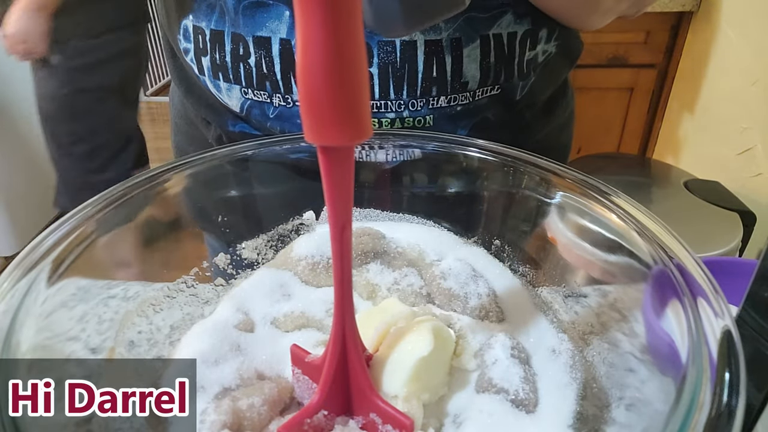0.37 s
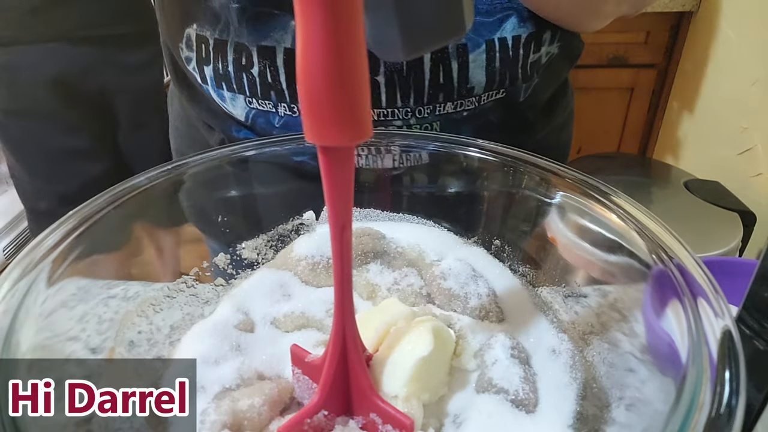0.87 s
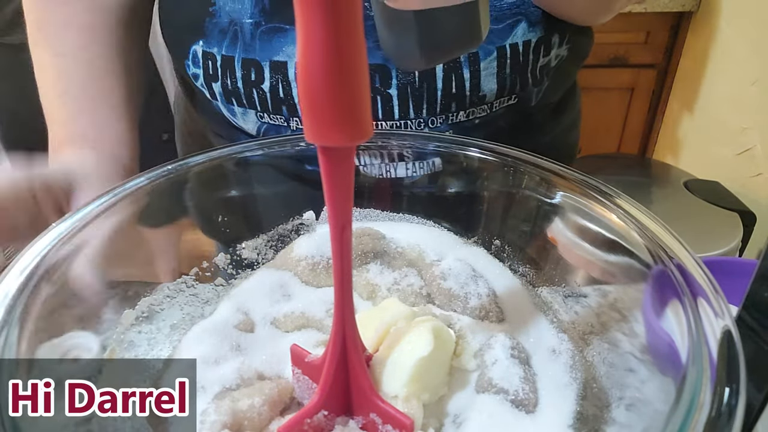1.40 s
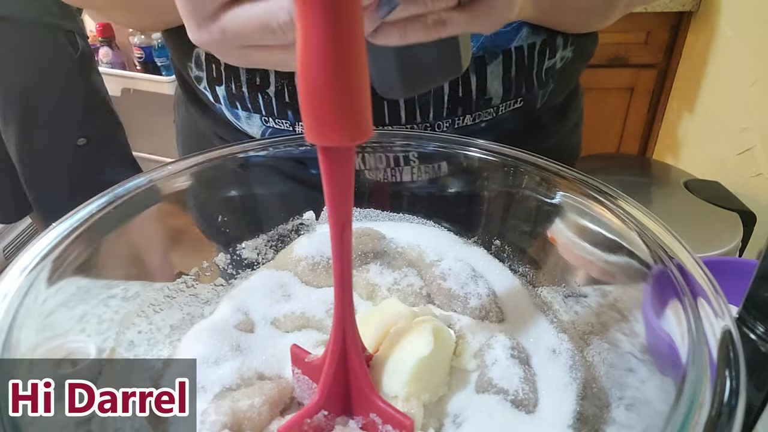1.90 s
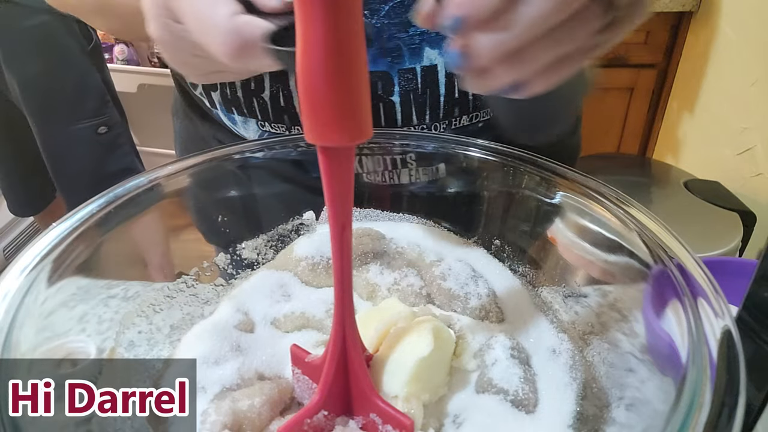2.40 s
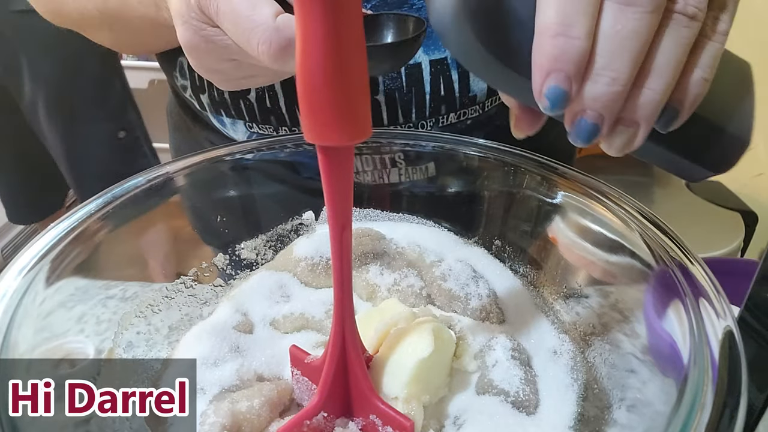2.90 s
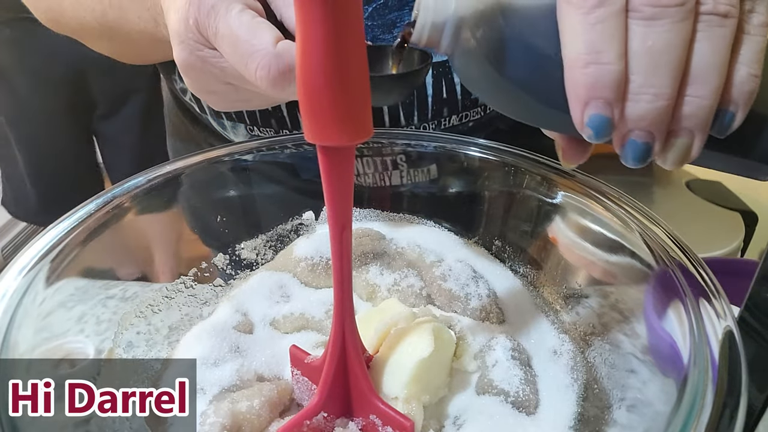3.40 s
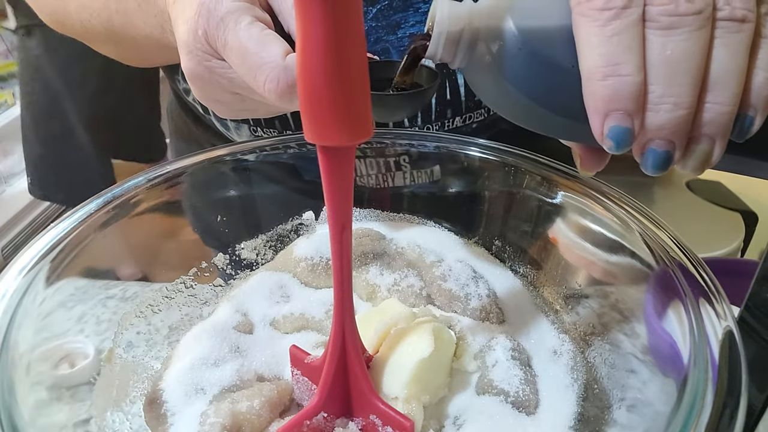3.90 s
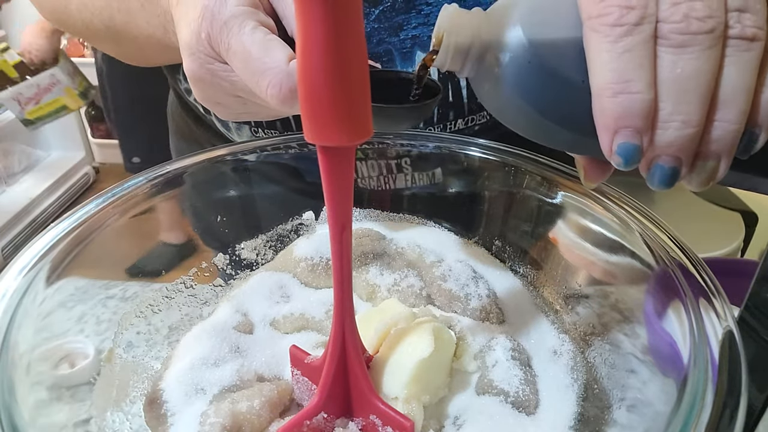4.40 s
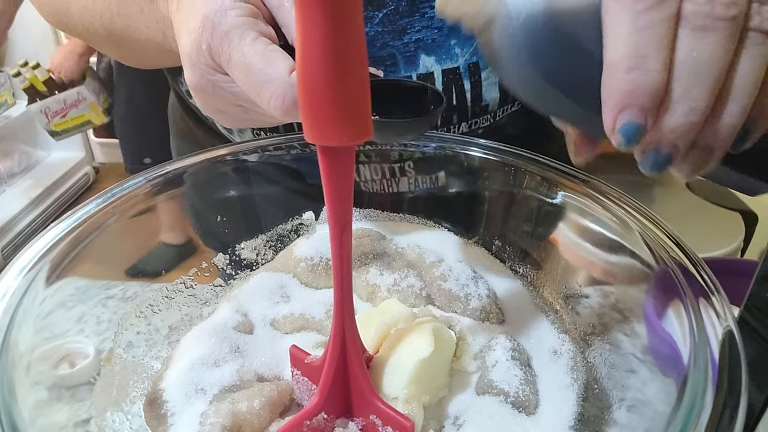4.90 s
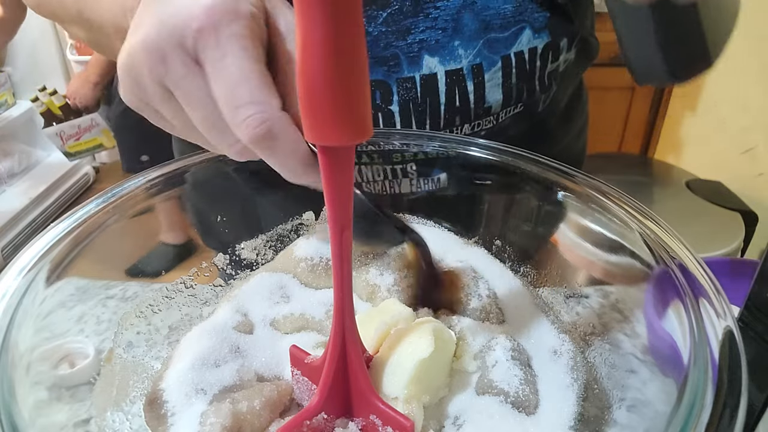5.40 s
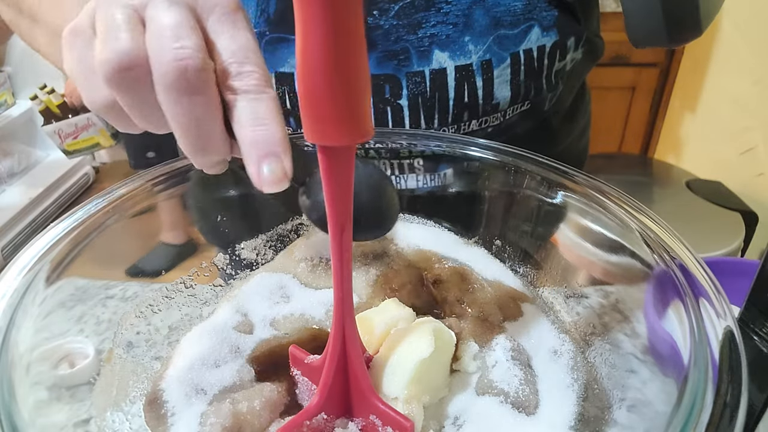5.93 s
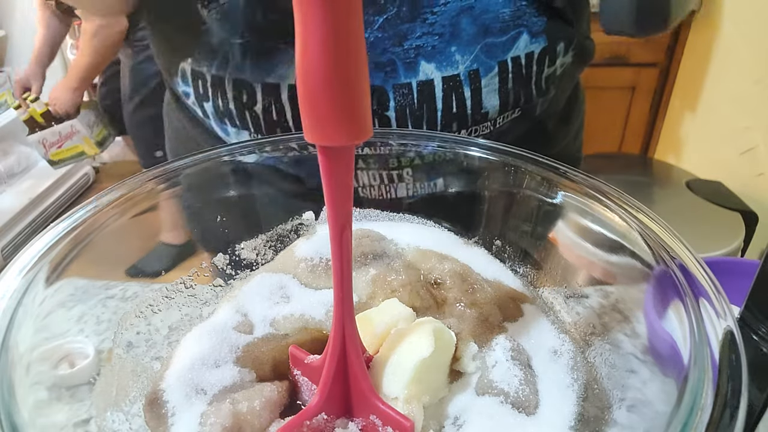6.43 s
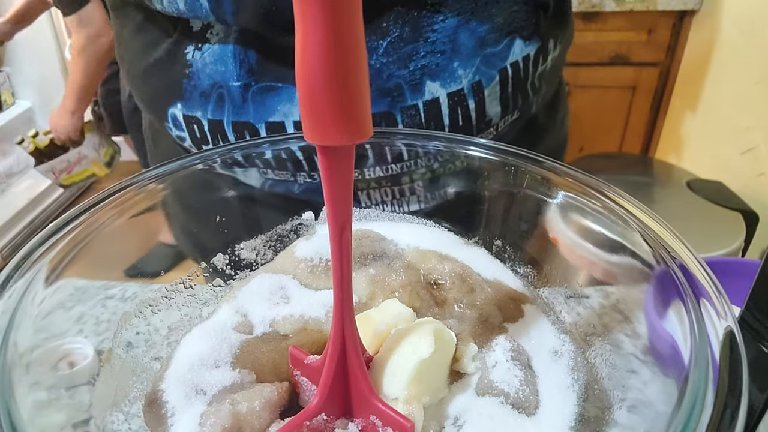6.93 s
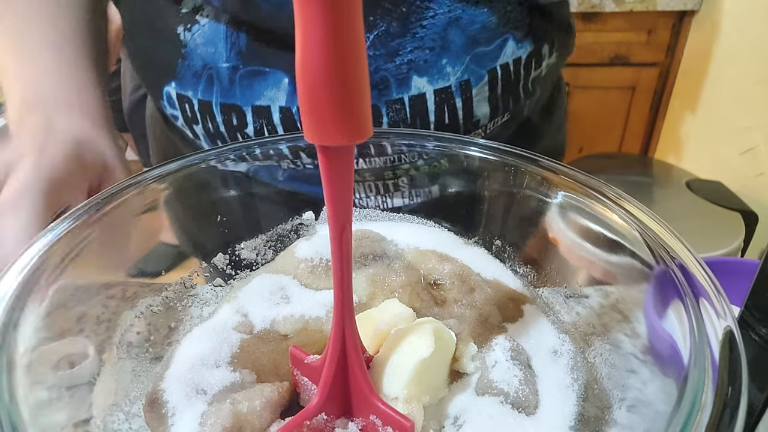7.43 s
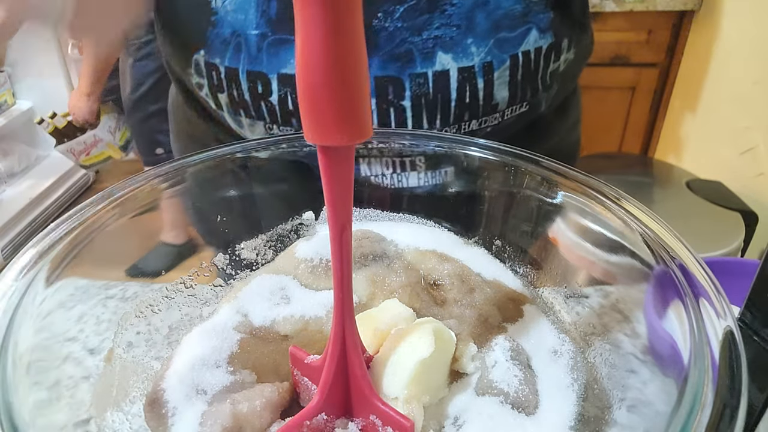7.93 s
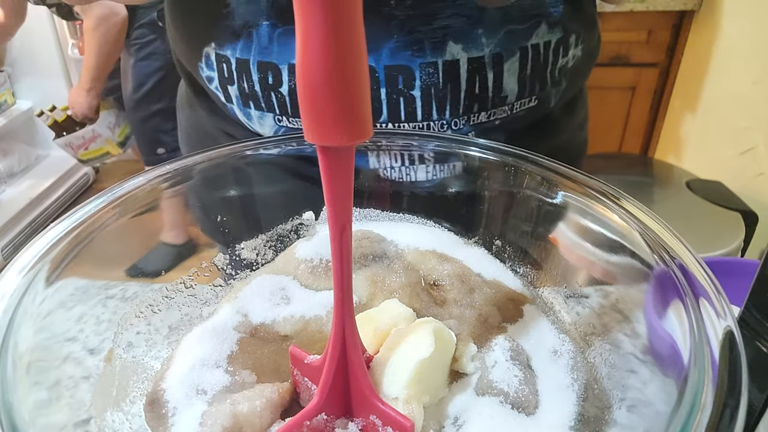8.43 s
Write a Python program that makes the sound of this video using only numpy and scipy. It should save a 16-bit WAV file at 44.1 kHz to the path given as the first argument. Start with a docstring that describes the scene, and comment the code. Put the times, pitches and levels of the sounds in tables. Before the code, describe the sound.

A small plastic bottle is snapped open and its cap turned, dry and near the microphone. The background hiss sinks, leaving an unsteady low hum and rumble with a few faint taps. After the middle, objects bump the counter with dull thuds, bright paired snaps follow, then several firm knocks and a small ringing touch of glass. Hiss and rustle swell around the handling.

```python
"""A small bottle is snapped open, twisted and handled in a home kitchen, and things are set down on the counter.
Clicks are single ticks with noise tails, knocks are bursts of coloured noise; bottle wall and glass ring in modes.
Squeaks, pings and floor thumps are sines, and the turning cap is noise through one resonance of the neck.
Beneath lie a fridge of tones and noise, rumble, hiss and rustle.
A noise suppressor lets hiss, rustle and low end swell around the handling and sink back between."""
import sys
import numpy as np
from scipy import signal
from scipy.fft import rfft, irfft
from scipy.io import wavfile
from scipy.ndimage import uniform_filter1d, map_coordinates

SR = 44100
rng = np.random.default_rng(int(sys.argv[2]) if len(sys.argv) > 2 else 0)


def put_to_file(sound):
    """Save the sound as 16-bit audio at rate SR, in the file named by the first command-line argument."""
    columns = np.atleast_2d(sound).T  # one column per channel
    safe = np.clip(columns, -1, 1)
    whole_steps = np.round(safe * 32767)
    wavfile.write(sys.argv[1], SR, whole_steps.astype(np.int16))


def voltage_ratio(decibels):
    """Convert decibels (scalar or array-like) to amplitude ratios, 20 dB per decade."""
    exponent = np.asarray(decibels, float) / 20
    return 10 ** exponent


N = 377672   # samples

# Treble colour of snaps and knocks. Each row: frequency in Hz, relative density in dB per Hz.
TREBLE_COLOUR = [(5000, -35.5), (8500, -17), (9910, -13), (12600, -3.5), (14700, -9.5), (16000, -39)]
SLAP_PATCHY_DB = 4.5   # flicker of the cracks and slaps


def rms_one(x):
    """Scale to rms 1."""
    return x / np.sqrt(np.mean(x ** 2) + 1e-20)


def in_time(rows):
    """Straight lines through rows that start with a time in seconds, one curve per further column."""
    s, *columns = np.transpose(rows)
    return [np.interp(np.arange(N) / SR, s, column) for column in columns]


def at_hz(points, hz):
    """Read a spectrum along a logarithmic frequency axis."""
    point_hz, values = np.transpose(points)
    return np.interp(np.log(hz), np.log(point_hz), values)


def bin_hz():
    """Frequencies of the whole-length spectrum, kept above zero for the logarithm."""
    return np.maximum(np.fft.rfftfreq(N, 1 / SR), 1)


def coloured(x, spectrum):
    """Filter a sound to a spectrum without shifting it in time."""
    return irfft(rfft(x) * voltage_ratio(at_hz(spectrum, bin_hz())), N)


def drift(rate):
    """Random wander: straight lines between random points of spread 1, `rate` points a second."""
    knots = rng.standard_normal(4000)
    return map_coordinates(knots, [np.arange(N) / SR * rate], order=1, mode="nearest")


def patchy(x, patchy_db):
    """Patches of about 90 Hz by 45 ms flicker in level."""
    cells = signal.stft(x, nperseg=1024)[2]
    field = rng.standard_normal(cells.shape[1:])
    field = uniform_filter1d(field, size=2, axis=0)
    field = uniform_filter1d(field, size=4, axis=1)
    return signal.istft(cells * voltage_ratio(patchy_db * rms_one(field)), nperseg=1024)[1][:, :N]


def noise(spectrum, patchy_db=0., even_s=0):
    """Stereo noise of a given colour and rms 1, alike on both sides in the bass; it may flicker or be held even."""
    # How alike the sides are. Each row: frequency in Hz, left-right likeness from 0 to 1.
    likeness = [(40, 0.99), (150, 1), (300, 1), (700, 0.58), (2000, 0.067), (8000, 0.25), (14000, 0.15)]
    alike = np.clip(at_hz(likeness, bin_hz()), 0, 1)
    mid, side = rfft(rng.standard_normal((2, N)))
    both = np.sqrt(1 + alike) * mid + np.sqrt(1 - alike) * side * [[1], [-1]]
    out = irfft(both * voltage_ratio(at_hz(spectrum, bin_hz())), N)
    if patchy_db:
        out = patchy(out, patchy_db)
    if even_s:
        power = np.mean(out ** 2, axis=0)
        out = out / np.sqrt(uniform_filter1d(power, size=int(even_s * SR)) + 1e-20)
    return rms_one(out)


def ring_time(width_hz):
    """A resonance falls by 60 dB sooner the wider it is."""
    return np.log(1000) / (np.pi * width_hz)


def ring(push, hz, t60):
    """Two-pole resonance: a unit click sets a decaying sine ringing."""
    r, w = voltage_ratio(-60 / (t60 * SR)), 2 * np.pi * hz / SR
    return signal.lfilter([0, np.sin(w)], [1, -2 * r * np.cos(w), r * r], push + 1e-18)


def blow(s, t60, rise_s):
    """Envelope of one contact: a short rise against an exponential fall, cut after half a second."""
    out, start = np.zeros(N), max(round(s * SR), 0)
    t = np.arange(min(SR // 2, N - start)) / SR
    fall = voltage_ratio(-60 * t / np.clip(t60, .005, .6))
    out[start:start + len(t)] = (1 - np.exp(-t / rise_s)) * fall
    return out


def swell(s, length):
    """A smooth rise and fall of height 1, centred on s."""
    return np.cos(np.pi * np.clip((np.arange(N) / SR - s) / length, -.5, .5)) ** 2


def struck(modes, hits, spread_db, waver_db, jolt_s):
    """Every hit pushes each mode with its own strength; the ring builds up over a few milliseconds."""
    out = np.zeros((2, N))
    t = np.arange(N) / SR
    for hz, db, t60 in modes:
        levels = [level + db + tilt_db * np.log2(hz / 4000) for _, level, tilt_db in hits]
        levels = voltage_ratio(levels + spread_db * rng.standard_normal(len(hits)))
        shape = sum(level * blow(s, t60, jolt_s) for (s, _, _), level in zip(hits, levels))
        waver = voltage_ratio(waver_db * drift(60))   # each partial wavers irregularly in level
        side_phase = rng.uniform(0, 1, (2, 1))
        out += shape * waver * np.sin(2 * np.pi * hz * t + 0.26 * waver_db * drift(70) + side_phase)
    return out


def suppressor(handling):
    """Gain from the loudness of the handling, averaged on both sides of each moment; louder opens it more."""
    open_from_db, slope_db_per_db, most_db, window_s = -68.5, 0.66, 25.5, 0.098
    frame = np.hanning(int(window_s * SR))
    power = signal.fftconvolve(np.mean(handling ** 2, axis=0), frame / frame.sum(), "same")
    level_db = 10 * np.log10(np.abs(power) + 1e-12)
    return voltage_ratio(np.clip(slope_db_per_db * (level_db - open_from_db), 0, most_db))


def hiss_and_rustle(settle_db, opening):
    """Two flickering noises that settle, swell softly for a moment and open with the suppressor."""
    # Hiss colour. Each row: frequency in Hz, relative density in dB per Hz.
    hiss_colour = [(1760, -66), (3000, -15), (3550, -13.5), (3830, -22.5), (4260, -10.5), (5140, -4.5),
                   (6260, -8.5), (7560, -4), (8340, -20), (8950, -15.5), (10700, -13.5), (11400, -4),
                   (13100, -3.5), (15000, -8), (16000, -28.5)]
    # Rustle colour. Each row: frequency in Hz, relative density in dB per Hz.
    rustle_colour = [(330, -32.5), (560, -5.5), (688, -11), (895, -3.5), (1040, -4.5), (2500, -10),
                     (4000, -11), (5200, -25), (8800, -120)]
    # Brief swells of hiss and rustle. Each row: centre in seconds, length in seconds, hiss in dB, rustle in dB.
    swells = [(0.027, 0.14, -61, -76), (0.429, 0.15, -51, -56), (0.5, 0.12, -65, -71),
              (0.608, 0.084, -53.5, -67), (0.656, 0.17, -91, -58), (0.903, 0.3, -73, -77.5),
              (1.1, .12, -70.5, -85), (1.42, 0.26, -64.5, -60), (1.526, 0.23, -80, -75),
              (1.798, 0.1, -77, -113), (2.076, 0.033, -77, -111), (2.308, 0.49, -75, -76),
              (2.64, 0.34, -75.5, -72), (2.757, 0.067, -46, -72), (3.402, 0.16, -77, -97),
              (3.624, 0.14, -83, -78), (3.882, 0.22, -73, -75), (4.063, 0.2, -71, -87),
              (4.34, 0.34, -76.5, -79), (4.486, .1, -88, -94), (5.016, 0.35, -79, -88),
              (5.32, 0.17, -82, -93), (5.514, 0.075, -64, -87), (5.682, 0.35, -83, -65.5),
              (6.074, 0.16, -108, -57), (6.315, 0.15, -75, -99), (6.743, 0.21, -68.5, -69),
              (7.384, 0.052, -92, -107), (7.609, 0.18, -86, -49.5), (7.697, 0.036, -56.5, -54.5),
              (7.87, 0.18, -89, -79.5), (8.095, 0.16, -59, -50.5), (8.217, 0.088, -80, -82),
              (8.265, 0.072, -99, -71), (8.415, 0.38, -99, -66)]
    shapes = np.array([swell(s, length) for s, length, _, _ in swells])
    hiss_swells, rustle_swells = voltage_ratio(np.array(swells)[:, 2:].T) @ shapes
    hiss = voltage_ratio(-82.5 + settle_db + 1.1 * drift(8.8))
    hiss = hiss + hiss_swells + voltage_ratio(-79.0) * (opening - 1)
    rustle = voltage_ratio(-90.5 + 0.91 * settle_db + drift(31))
    rustle = rustle + rustle_swells + voltage_ratio(-88.5) * (opening - 1)
    return hiss * noise(hiss_colour, patchy_db=1.8) + rustle * noise(rustle_colour, patchy_db=4.2)


def rumble(low_db):
    """Bass noise of even loudness, following the swing of the low end."""
    # Rumble colour. Each row: frequency in Hz, relative density in dB per Hz.
    rumble_colour = [(8.8, -32), (15, -3), (59, 3), (86, -11.5), (113, -2), (150, -16), (200, -34),
                     (330, -120)]
    return voltage_ratio(-63.5 + low_db) * noise(rumble_colour, even_s=0.098)


def fridge(low_db):
    """Unsteady compressor tones over a low noise drone, following most of the swing of the low end."""
    # Compressor tones. Each row: frequency in Hz, rms level in dB ahead of the fridge gain.
    hum_tones = [(118.4, -67.5), (242.2, -75.5), (436.0, -85.5), (479.1, -84.5)]
    # Drone colour. Each row: frequency in Hz, relative density in dB per Hz.
    drone_colour = [(76, -31), (130, -27), (182, 0), (210, -23.5), (232, -8), (265, -16.5), (403, -23),
                    (487, -17.5), (650, -32.5), (840, -47.5), (1430, -120)]
    t, hum = np.arange(N) / SR, 0
    for hz, db in hum_tones:
        level = voltage_ratio(db + 1.2 * drift(7.7)) * np.sqrt(2)
        hum = hum + level * np.sin(2 * np.pi * hz * t + 1.17 * drift(11))
    return voltage_ratio(-4.5 + 0.86 * low_db) * (hum + voltage_ratio(-74) * noise(drone_colour))


def background(opening):
    """Hiss, rustle, rumble and fridge sink after the start, then drift; the low end also heaves and wanders."""
    # Settling of the background. Each row: time in seconds, lift in dB.
    settle = [(0, 16), (.12, 17.5), (.3, 17.5), (.9, 9), (1.3, 8), (1.7, 6), (2.0, 3), (2.5, 5.5),
              (3.0, 3.5), (3.5, 2), (4.2, 7.5), (4.7, 3.5), (5.3, 1.5), (6.0, 5), (6.5, 2), (7.0, 4),
              (7.4, 6), (8.0, 3), (8.56, 5.5)]
    # Rumble and fridge swell or dip briefly together. Each row: centre in seconds, lift in dB.
    heaves = [(0.031, 15), (.31, -0.5), (.45, 9.5), (.52, 9), (.6, 0.5), (.93, 5), (1.1, -4.5), (1.32, 2.5),
              (1.52, 6.5), (1.69, 6.5), (1.8, 4.5), (2.07, 6), (2.34, 8), (2.48, -2.5), (2.6, -0.5),
              (2.87, 9), (3.38, 3), (3.5, 5), (3.62, 8.5), (3.74, 5), (3.86, 2.5), (4.001, 8.5),
              (4.331, 17.5), (4.6, 7.5), (4.84, 6), (5.34, 7), (5.51, 8), (5.65, 9.5), (6.08, 11),
              (6.44, 1), (6.58, 6), (6.768, 14), (7.18, 8), (7.37, 2.5), (7.521, 8), (7.63, 8.5),
              (7.71, 13), (8.05, 9.5), (8.45, -1)]
    settle_db, = in_time(settle)
    heave_db = sum(db * swell(s, 0.078) for s, db in heaves)
    opening_db = 20 * np.log10(opening)
    low_db = 0.62 * settle_db + heave_db + 0.63 * opening_db + 4.5 * drift(11)
    return hiss_and_rustle(settle_db, opening) + rumble(low_db) + fridge(low_db)


def thumps():
    """Dull blows through floor and counter: each sets one low mode swinging."""
    # Each row: time in seconds, level in dB, frequency in Hz, nominal 60 dB fall time in seconds.
    thump_hits = [(0.009, -21, 78, 0.26), (3.984, -27.5, 38.7, 0.26), (4.307, -35.5, 34.8, 0.72),
                  (5.61, -36, 110.6, 0.32), (6.049, -25.5, 114.7, 0.27), (7.498, -30, 73.6, 0.44)]
    t, out = np.arange(N) / SR, 0
    for s, db, hz, t60 in thump_hits:
        shape = blow(s - .02, t60, 0.073)   # the slow rise begins ahead of the listed time
        out = out + voltage_ratio(db) * shape * np.sin(2 * np.pi * hz * (t - s))
    return out


def clicks():
    """Snaps of plastic: a sharp tick, then a rough crack and a quieter, longer noise tail."""
    # Each row: start in seconds, level in dB, treble against it in dB, tail 60 dB fall time in seconds,
    # left over right in dB (wider in the treble).
    snaps = [(0.3211, -20, -1, 0.092, -1.5), (0.4231, -28, 8.5, 0.1, -2.5), (0.4336, -25.5, -18, 0.16, 3),
             (0.621, -23, -3, 0.12, -0.5), (1.3035, -20.5, -5.5, 0.098, -1), (1.3818, -35.5, -22, 0.21, -1),
             (1.4171, -28.5, -13, 0.25, 0), (1.457, -21, -12, 0.081, -3), (1.488, -26.5, -27, 0.1, -2),
             (5.5119, -70, -7, 0.14, 8), (5.69, -41, -17, 0.072, 12), (7.0672, -15.5, 4.5, 0.031, -4),
             (7.1583, -16.5, -1, 0.12, -2.5), (7.7005, -31, 4, 0.045, 0), (7.7105, -35, -3, .05, -3),
             (7.7504, -21, -10.5, 0.1, -2)]
    # Snap colour. Each row: frequency in Hz, relative density in dB per Hz.
    snap_colour = [(410, -9.5), (700, -22.5), (1050, -9), (1990, -8), (2320, -10), (2930, -15.5),
                   (3830, -11.5), (5510, 4.5), (9000, -14), (11700, -45.5), (19800, -120)]
    treble_pan_factor = 2.64   # the treble is more directional
    body = top = 0
    ticks, top_ticks = np.zeros((2, 2, N))
    for s, db, top_db, t60, pan_db in snaps:
        crack, tail = blow(s, 0.017, 0.0014), blow(s, t60, 0.0028)
        shape = voltage_ratio(-10.0) * crack + voltage_ratio(-17.5) * tail
        half_pan_db = pan_db / 2 * np.array([[1], [-1]])
        sides = voltage_ratio(db + half_pan_db)
        top_sides = voltage_ratio(db + top_db + treble_pan_factor * half_pan_db)
        body, top = body + sides * shape, top + top_sides * shape
        ticks[:, round(s * SR) + 20] = sides[:, 0]
        top_ticks[:, round(s * SR) + 20] = top_sides[:, 0]
    unit = np.eye(1, N)[0]
    tick = 0
    for train, colour in [(ticks, snap_colour), (top_ticks, TREBLE_COLOUR)]:
        tick = tick + coloured(train, colour) / coloured(unit, colour)[0]   # a unit click keeps height 1
    rough = body * noise(snap_colour, patchy_db=SLAP_PATCHY_DB, even_s=0.0012)
    return voltage_ratio(-2.5) * tick + rough + top * noise(TREBLE_COLOUR, even_s=0.0013)


def squeaks_and_pings():
    """Rough stick-slip tones and gliding pings, with their second and third partials."""
    # Faint high squeaks. Each row: start in seconds, length in seconds, frequency in Hz,
    # level in dB, overtones against it in dB.
    squeaks = [(1.619, 0.068, 3870, -79, 5), (1.632, 0.12, 3915, -76, -25), (4.025, 0.053, 4000, -73, -12),
               (4.113, .06, 3890, -77.5, -10), (4.213, .06, 3900, -75, -12), (4.324, 0.059, 3910, -74, -12),
               (4.406, 0.065, 3860, -70, 4), (4.492, 0.075, 3810, -72.5, -0.5)]
    # Small pings and chirps. Each row: start in seconds, length in seconds, start in Hz, end in Hz, level in dB.
    pings = [(0.378, 0.034, 3340, 3330, -59), (0.447, .035, 2080, 2050, -58),
             (1.777, 0.05, 1334, 1344, -71.5), (4.942, 0.077, 1400, 1450, -72),
             (4.98, .09, 1740, 1640, -83), (5.052, 0.053, 3350, 3360, -81.5),
             (5.527, 0.011, 3100, 3100, -69.5), (5.737, 0.057, 890, 917, -63),
             (6.266, 0.032, 505, 522, -64), (7.699, 0.029, 980, 1020, -40.5),
             (7.714, 0.067, 1910, 1890, -42.5), (7.903, 0.013, 2940, 3080, -61)]
    t, out = np.arange(N) / SR, 0
    jitter, flutter = .7 * drift(250), voltage_ratio(3.0 * drift(60))
    tones = [(s, length, hz, hz, db, over_db) for s, length, hz, db, over_db in squeaks]
    tones += [(*row, -20) for row in pings]   # pings have overtones 20 dB down
    for s, length, start_hz, end_hz, db, over_db in tones:
        part = np.clip((t - s) / length, 0, 1)
        turns = length * (start_hz * part + (end_hz - start_hz) * part ** 2 / 2)
        phase = 2 * np.pi * turns + jitter
        window = np.abs(np.sin(np.pi * part ** .7) ** .8)
        overtones = np.sin(2 * phase) + voltage_ratio(-1.5) * np.sin(3 * phase)
        out = out + voltage_ratio(db) * window * flutter * (np.sin(phase) + voltage_ratio(over_db) * overtones)
    return out


def bottle_taps():
    """The bottle wall rings: broad modes that fall by 60 dB within 70 ms and waver strongly."""
    # Each row: time in seconds, level in dB, brightness in dB per octave.
    taps = [(0.4224, -34.5, 16), (0.6219, -48.5, -3.5), (6.0328, -23, 3), (7.066, -21, -1),
            (7.157, -18.5, 2), (7.4867, -26, 10), (7.591, -32, 0), (7.7, -42, 2)]
    # Wall modes. Each row: frequency in Hz, width in Hz, relative level in dB.
    wall_modes = [(2060, 24, -1.5), (2380, 21, -4), (3260, 12, -4), (3900, 77, 2.5), (5280, 55, -22),
                  (5500, 69, -4), (6250, 56, -11), (6780, 31, -11), (7300, 64, -6)]
    modes = [(hz, db - 9.0, min(ring_time(width), .07)) for hz, width, db in wall_modes]
    return struck(modes, taps, spread_db=3.0, waver_db=10.0, jolt_s=0.0072)


def twist():
    """The cap turns on its thread: friction noise heard through the resonance of the hollow neck."""
    # Each row: time in seconds, rms level in dB.
    turning = [(1.28, -96), (1.294, -75), (1.312, -50.5), (1.34, -77), (1.37, -55), (1.466, -53.5),
               (1.51, -56), (1.56, -102)]
    neck_hz, neck_width_hz = 1020, 110
    t = np.arange(N) / SR
    inside = (t > turning[0][0]) & (t < turning[-1][0])
    tone = rms_one(ring(rng.standard_normal(N), neck_hz, ring_time(neck_width_hz)))
    return inside * voltage_ratio(in_time(turning)[0]) * tone


def knocks():
    """Things set down: a broad slap with its tail, the short ring of the counter and a thud that swells later."""
    # Each row: start in seconds, level in dB, then mids, thud and treble against it in dB.
    contacts = [(2.333, -60, -10, 2, -5), (2.5014, -51, -24, -26, -20), (2.7354, -38.5, -13.5, -12, -11.5),
                (2.751, -38, -6.5, -9, -35), (5.6017, -30, -8.5, -2, -23), (5.713, -46, -16, -21, -14.5),
                (6.0319, -27, -10, -6.5, -23), (7.067, -26.5, -12, -3.5, -14.5),
                (7.1528, -27.5, -25, -21, -21), (7.4858, -17, -16, -11, -16), (7.502, -32.5, -11, -15, -27),
                (7.59, -27.5, -10.5, -8.5, -22.5), (7.702, -33.5, -14, -5, -7.5), (7.903, -55, -7, -1, -28),
                (8.011, -53, -6, 8.5, -17), (8.0527, -31.5, -9.5, -2.5, -7), (8.243, -52.5, -9, -14.5, -23),
                (8.357, -51, -5, 2.5, -27), (8.421, -47.5, -15, 3.5, -3)]
    # Slap colour. Each row: frequency in Hz, relative density in dB per Hz.
    slap_colour = [(880, -41), (1500, -21.5), (2060, -8.5), (2270, -21), (2420, -14), (3850, -9.5),
                   (4200, -15), (5260, -11), (6740, -12.5), (8500, -26.5), (11000, -43.5), (18700, -120)]
    # Counter resonances. Each row: frequency in Hz, width in Hz, relative level in dB.
    counter_modes = [(551, 62, 4.5), (890, 9.4, 8), (1056, 53, 1), (1342, 24, 6)]
    # Thud colour. Each row: frequency in Hz, relative density in dB per Hz.
    thud_colour = [(41, -51), (70, -22), (113, -5.5), (201, -4), (265, -15.5), (307, -17), (380, -13.5),
                   (490, -21), (840, -120)]
    t60 = 0.16   # seconds
    slap = top = wood = thud = 0
    for s, db, mid_db, thud_db, top_db in contacts:
        shape = voltage_ratio(db - 8.0) * (blow(s, 0.0088, 0.0014) + blow(s, t60, 0.0053))
        slap, top = slap + shape, top + voltage_ratio(top_db + 10) * shape
        wood = wood + voltage_ratio(db + mid_db + 2.5) * blow(s, 1.074 * t60, 0.01)
        thud = thud + voltage_ratio(db + thud_db) * blow(s, 1.69 * t60, 0.021)
    hz = np.geomspace(250, 2000, 300)
    humps = sum(voltage_ratio(db) ** 2 / (1 + (2 * (hz - centre) / width) ** 2) for centre, width, db in counter_modes)
    counter_colour = [(100, -90), *zip(hz, 10 * np.log10(humps)), (3000, -90)]
    out = slap * noise(slap_colour, patchy_db=SLAP_PATCHY_DB) + top * noise(TREBLE_COLOUR)
    out = out + wood * voltage_ratio([[1.5], [-1.5]]) * noise(counter_colour, even_s=0.0045)   # leans left
    return out + thud * noise(thud_colour, even_s=0.0088)


def clinks():
    """Glass touching glass: many narrow modes ring on and waver gently."""
    # Each row: time in seconds, level in dB, brightness in dB per octave.
    touches = [(8.053, -35.5, 2.5), (8.4206, -45, 4)]
    # Glass modes. Each row: frequency in Hz, relative level in dB, 60 dB fall time in seconds.
    glass_modes = [(1890, -15, 0.47), (2800, -7.5, 0.3), (3100, -18, 0.39), (3270, -10.5, 0.19),
                   (3840, -17, 0.27), (3813, -14, 0.35), (3932, 4, 0.23), (4350, -20, .15),
                   (4460, -23, 0.28), (4700, -10, 0.32), (5066, -37, 0.26), (5430, -7, 0.29),
                   (5680, -19, 0.28), (5870, -8, 0.25), (6300, -23, 0.17), (6680, -9, 0.17),
                   (7550, -7.5, 0.17), (7300, -18, 0.32)]
    return struck(glass_modes, touches, spread_db=2.5, waver_db=3.0, jolt_s=0.0046)


def scene():
    """All sources together; sound reaches the right microphone a little before the left."""
    left_lag_s, left_gain_db = 0.0002848, .5
    handling = clicks() + bottle_taps() + knocks() + clinks()
    quiet_sources = thumps() + squeaks_and_pings() + twist()
    left, right = background(suppressor(handling)) + handling + quiet_sources
    delay = np.exp(-2j * np.pi * np.fft.rfftfreq(N, 1 / SR) * left_lag_s)
    late = irfft(rfft(left) * delay, N)
    return np.array([voltage_ratio(left_gain_db) * late, right])


def roll_off(x):
    """The treble ends steeply here."""
    return signal.sosfilt(signal.butter(12, 16480, fs=SR, output="sos"), x)


def record(dry):
    """The finished mix passes to the last stage unchanged."""
    return roll_off(dry)


dry = scene()
out = record(dry)
put_to_file(out)
```